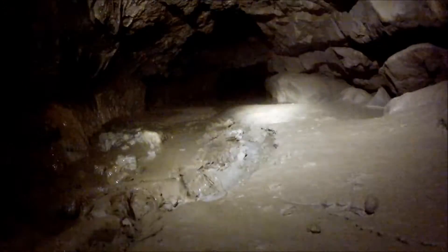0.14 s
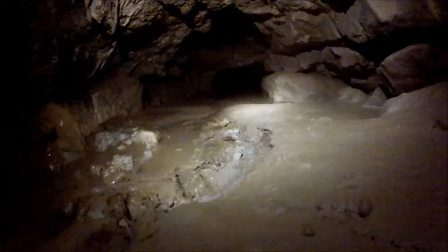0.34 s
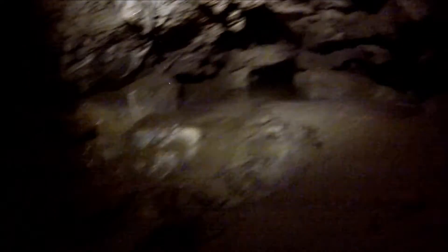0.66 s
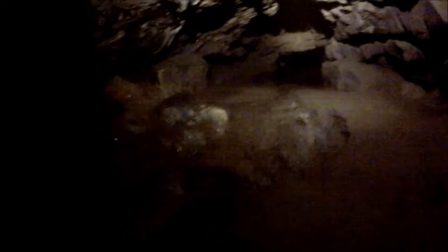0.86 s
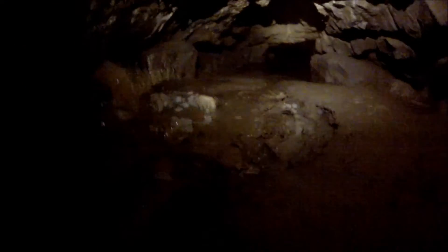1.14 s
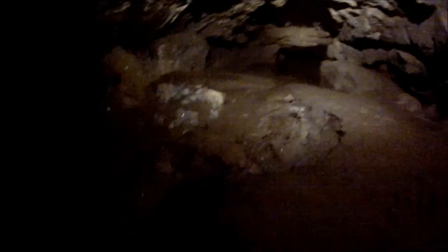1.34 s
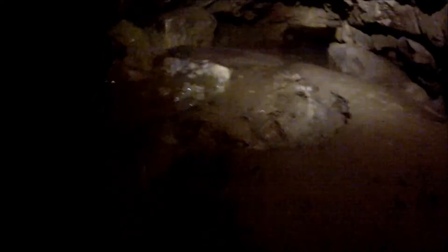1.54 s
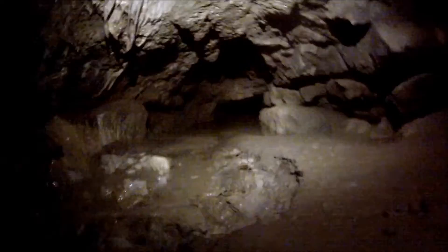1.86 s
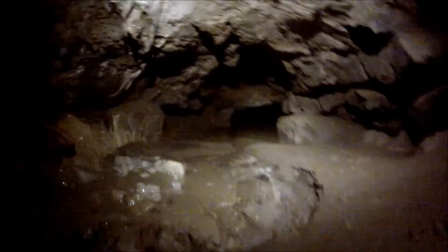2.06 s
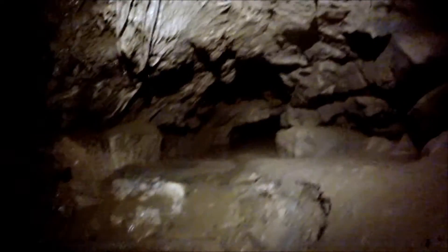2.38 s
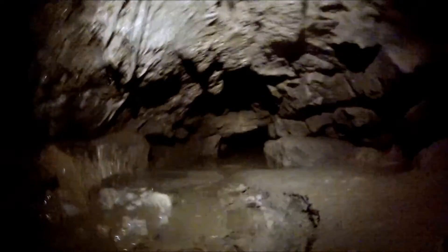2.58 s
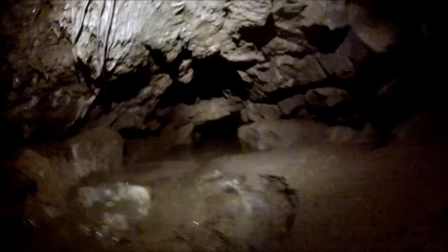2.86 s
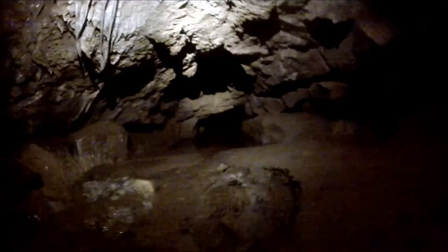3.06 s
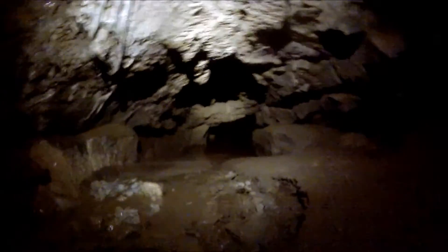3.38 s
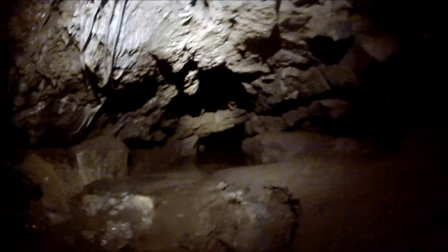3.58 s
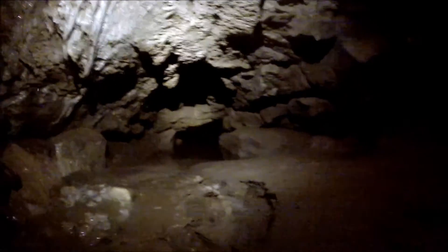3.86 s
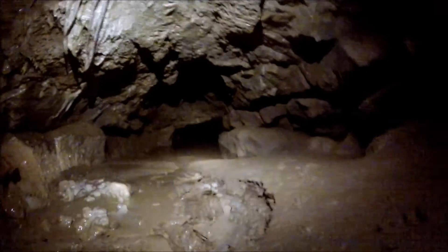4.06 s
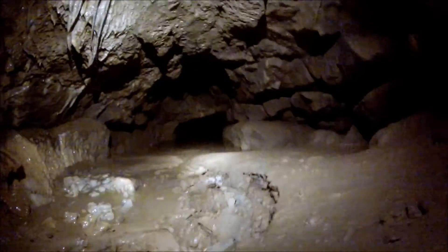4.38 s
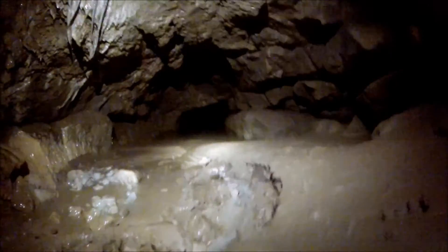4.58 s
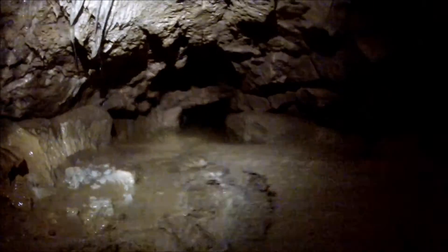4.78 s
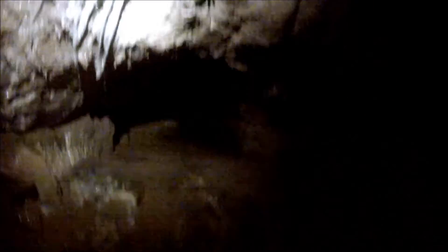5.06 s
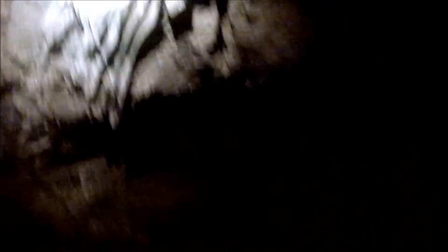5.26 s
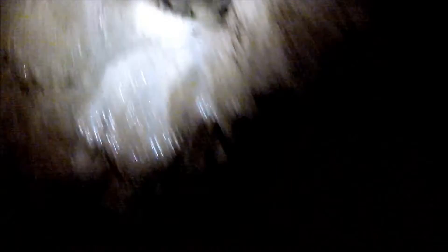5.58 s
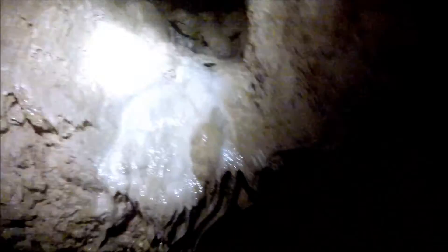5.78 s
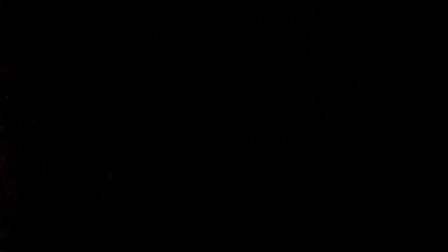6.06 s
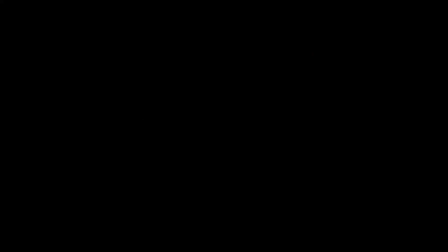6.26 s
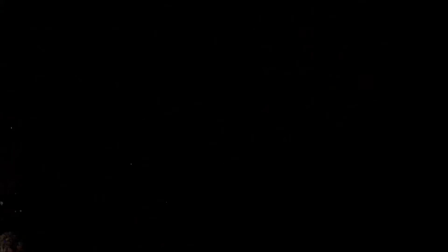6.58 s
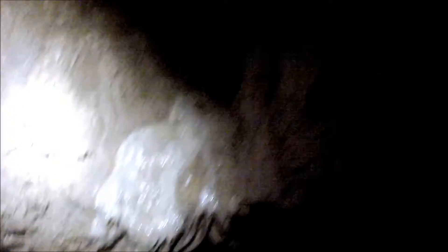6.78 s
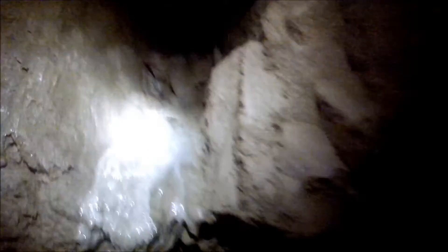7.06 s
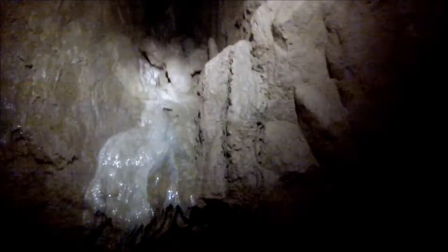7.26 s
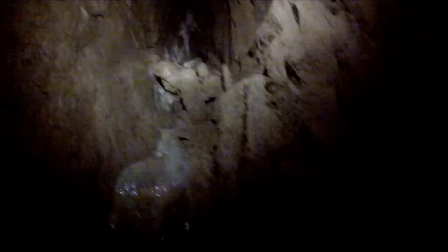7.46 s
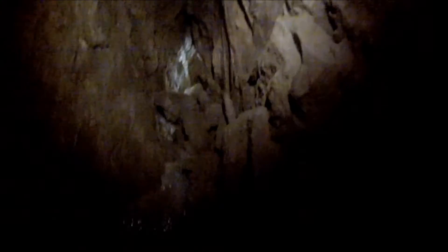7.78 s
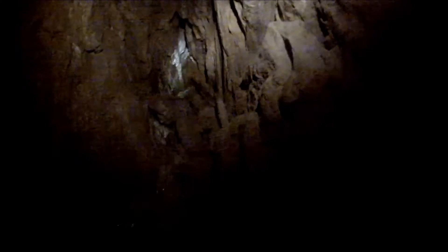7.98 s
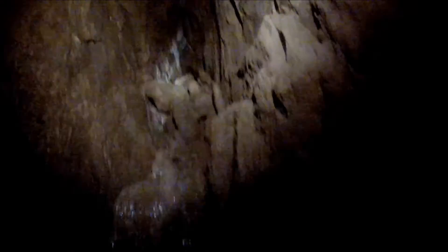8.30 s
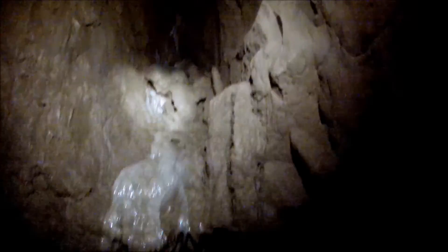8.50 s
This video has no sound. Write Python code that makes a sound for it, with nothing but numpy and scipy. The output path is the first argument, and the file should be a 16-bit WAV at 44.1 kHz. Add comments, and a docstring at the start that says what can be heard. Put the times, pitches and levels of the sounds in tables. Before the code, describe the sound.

In a small rocky cave, wet muddy gear drags, swipes and knocks against the camera case, very close and nearly dry. Sharp clacks, dull thumps and small squelches come thickest in the first three seconds, then thin out. After about four and a half seconds the handling stops, and a thin stream of water remains, with gurgles, drips and a short cave echo over faint low rumble.

```python
"""A small cave: water trickles while someone shifts about in the mud with a camera.
Wet gear drags, swipes and knocks against the camera's case: stick-slip jolts and blows through its
resonances, plus low flexing, bumps and squelches. Then the movement stops, leaving the running water
(filtered noise, bubbles), gurgles and a few drips (damped sines, spatter), over a deep rumble."""
import sys
import numpy as np
from scipy import signal
from scipy.fft import rfft, irfft, next_fast_len
from scipy.io import wavfile
from scipy.ndimage import uniform_filter1d, map_coordinates

SR = 44100
rng = np.random.default_rng(int(sys.argv[2]) if len(sys.argv) > 2 else 0)


def to_wav(s):
    """Save 16-bit WAV."""
    ch = np.atleast_2d(s).T  # columns
    pcm = np.round(np.clip(ch, -1, 1) * 32767)  # PCM
    wavfile.write(sys.argv[1], SR, pcm.astype(np.int16))


N = 380577
T = np.arange(N) / SR


def amp(db):
    """Decibels to gain."""
    return 10 ** (np.asarray(db) / 20)


def unit(x):
    """Scale to rms 1."""
    return x / np.sqrt(np.mean(x ** 2) + 1e-20)


def along(points, hz):
    """Interpolate (frequency [Hz], value) points on a log frequency axis."""
    f, v = np.transpose(points)
    return np.interp(np.log(hz + 1), np.log(f + 1), v)


def humps(rows, hz):
    """Sum of bell-shaped lifts and dips [dB]."""
    return sum(db * np.exp(-((hz - centre) / width) ** 2) for centre, width, db in rows)


def level_curve(rows):
    """Interpolate (time [s], level [dB]) rows to one value per sample."""
    s, db = np.transpose(rows)
    return np.interp(T, s, db)


def wobble(rate_hz):
    """Smooth random curve, rate_hz knots per second."""
    return map_coordinates(rng.standard_normal(int(N * rate_hz / SR) + 4), [T * rate_hz])


def coloured(x, db_of):
    """Causal minimum-phase filter with gain db_of(Hz), built from its folded cepstrum."""
    m = 2 * next_fast_len(N // 2 + 8192)
    gain = amp(db_of(np.fft.rfftfreq(m, 1 / SR)))
    cepstrum = irfft(np.log(gain + 1e-6), m)
    cepstrum[1:m // 2] *= 2
    cepstrum[m // 2 + 1:] = 0
    return irfft(rfft(x, m) * np.exp(rfft(cepstrum)), m)[:N]


def coloured_noise(points):
    """White noise shaped by (frequency [Hz], gain [dB]) points, rms 1."""
    return unit(coloured(rng.standard_normal(N), lambda hz: along(points, hz)))


def patchy(x, depth_db, size):
    """Shifting colour: smooth random gain over time and frequency, within +-2 depth_db."""
    z = signal.stft(x, nperseg=512)[2]
    field = rng.standard_normal(z.shape)
    for _ in range(2):
        field = uniform_filter1d(uniform_filter1d(field, size, 0), size + 1, 1)
    gain_db = depth_db * 2 * np.tanh(unit(field) / 2)
    return signal.istft(z * amp(gain_db), nperseg=512)[1][:N]


def add(track, s, sound):
    """Mix a sound in at time s [s]."""
    part = track[max(round(s * SR), 0):][:len(sound)]
    part += sound[:len(part)]


def bubbles(count, centre_hz, cycles, spread_db):
    """Small bubbles: damped sines, phase advancing faster over their first three decay times."""
    t = np.arange(SR // 40) / SR
    start = rng.integers(0, N, (count, 1))
    hz = np.clip(centre_hz * np.exp(0.36 * rng.standard_normal((count, 1))), 1100, SR / 4)
    size = amp(spread_db * np.minimum(rng.exponential(size=(count, 1)), 3))
    age = t * hz / cycles  # in decay times
    envelope = size * np.exp(-age) * (1 - np.exp(-8 * age))
    rings = envelope * np.sin(2 * np.pi * hz * t * (1 + 0.028 * np.minimum(age, 3)))
    when = start + np.arange(len(t))
    return unit(np.bincount(when.ravel(), rings.ravel())[:N])


# running water, before STREAM_DB: (time [s], level [dB])
FLOW_LEVEL = [(4.62, -63.5), (4.72, -58.5), (5.1, -64), (6.8, -63.5), (8.63, -65)]
# wash spectrum, relative: (frequency [Hz], density [dB per Hz])
WASH_SPECTRUM = [(60, -30.5), (200, -6.5), (330, -5), (550, -6.5), (800, -6.5), (1200, -6.5), (1850, -4.5),
                 (2900, -6.5), (3600, -7), (4500, -10.5), (7000, -13), (10000, -16), (15500, -19.5)]
STREAM_DB, FIZZ_DB = 0.78, -10.0  # FIZZ_DB relative to the wash


def stream():
    """Thin running water: a noise wash of shifting colour with fine bubbles."""
    wash = patchy(rng.standard_normal(N), depth_db=2.6, size=6)
    wash = unit(coloured(wash, lambda hz: along(WASH_SPECTRUM, hz) + 0.4 * humps(CASE_MODES, hz)))
    fizz = bubbles(count=2500, centre_hz=2240, cycles=10.8, spread_db=5.0)
    level_db = level_curve(FLOW_LEVEL) + STREAM_DB + 0.98 * wobble(7.7)
    return amp(level_db) * (wash + amp(FIZZ_DB) * fizz)


# deep murmur, before RUMBLE_DB: (time [s], level [dB])
MURMUR_LEVEL = [(0, -53), (2.7, -52), (3.3, -63), (7.4, -63.5), (8.63, -70.5)]
# deep murmur spectrum, relative: (frequency [Hz], density [dB per Hz])
HOLLOW_SPECTRUM = [(10, -13.5), (20, 2), (50, -2.5), (80, -12.5), (130, -20), (300, -56.5)]
# far water spectrum, relative: (frequency [Hz], density [dB per Hz])
DISTANT_SPECTRUM = [(40, -22.5), (100, -1.5), (160, -1), (260, -2), (400, -7), (600, -13.5), (1000, -36)]
RUMBLE_DB, DISTANT_DB = 4, -65.5


def rumble():
    """Deep murmur of the passage and dull water farther along it: two low noise bands."""
    murmur_db = level_curve(MURMUR_LEVEL) + RUMBLE_DB + 0.79 * wobble(4.0)
    deep = amp(murmur_db) * coloured_noise(HOLLOW_SPECTRUM)
    return deep + amp(DISTANT_DB) * coloured_noise(DISTANT_SPECTRUM)


def jerks(rate_hz, spread_db):
    """Single jolts at random moments, mostly small, rms 1."""
    fires = rng.random(N) < rate_hz / SR
    size = amp(spread_db * np.minimum(rng.exponential(size=N), 3))
    return unit(fires * rng.choice([-1, 1], N) * size)


def slips(rate_hz, spread_db, smooth):
    """Stick-slip: clumped jerks over fibre hiss, colour moving with the contact; grit snaps on top."""
    clump_db = 5 * np.tanh((2.3 * wobble(140) + 0.9 * wobble(35)) / 5)
    fibres = smooth * rng.standard_normal(N)
    clumped = (jerks(rate_hz, spread_db) + fibres) * amp(clump_db)
    grit = jerks(rate_hz=220, spread_db=5)
    return unit(unit(patchy(clumped, depth_db=4.5, size=4)) + .5 * grit)


# slip of wet fabric: (frequency [Hz], gain [dB])
SLIP_SPECTRUM = [(40, -24), (300, -15.5), (650, -24.5), (950, -11.5), (1500, -4.5), (2000, -2.5),
                 (2900, -10.5), (4000, -16.5), (5500, -23.5), (8000, -21), (15500, -19.5)]
# case resonances: (centre [Hz], half width to 1/e of lift [Hz], lift at firmness 1 [dB])
CASE_MODES = [(1127, 103, 4.5), (2350, 290, 7), (3542, 410, 13), (4920, 340, 5.5), (7100, 320, 3),
              (8444, 343, 13), (9680, 660, 8), (14150, 420, 4.5)]


def on_case(x, firmness):
    """Slips heard through the case; firmer contact brings out its resonances."""
    return coloured(x, lambda hz: along(SLIP_SPECTRUM, hz) + firmness * humps(CASE_MODES, hz))


DRAG_SWELL_DB, DRAG_EASE_DB = 8.5, 6.5  # gain up to the hardest moment, loss after it
GRIP_S, RELEASE_S = 0.021, 0.03  # 20 dB rise / fall times outside a drag


def drag_db(hardest_s, swell_s, ease_s, db):
    """Level of one drag [dB]: grips, swells to its hardest moment, eases, lets go."""
    start, end = hardest_s - swell_s, hardest_s + ease_s
    pressing = np.interp(T, [start, hardest_s, end], [-DRAG_SWELL_DB, 0, -DRAG_EASE_DB])
    outside = np.maximum(start - T, 0) / GRIP_S + np.maximum(T - end, 0) / RELEASE_S
    return db + pressing - 20 * np.minimum(outside, 10)


# slow drags of wet gear:
# (hardest moment [s], swell [s], ease [s], body level [dB], crispness: treble over body [dB])
DRAG_EVENTS = [(.52, .17, 0.18, -55.5, 0), (.97, 0.074, 0.041, -38, -7), (1.13, 0.069, 0.057, -41, -3.5),
               (1.312, 0.074, 0.091, -44.5, -1), (1.42, 0.011, .035, -32, -4.5),
               (1.711, 0.22, 0.037, -29, 0.5), (1.84, 0.12, 0.075, -36, -3.5),
               (1.939, 0.038, 0.074, -34.5, 3.5), (2.51, 0.06, 0.052, -31, 1.5),
               (2.69, 0.087, 0.074, -28, -1.5), (2.885, 0.052, 0.041, -35, 0),
               (3.009, 0.026, 0.059, -37, -2), (3.15, 0.017, .13, -42, -6.5), (3.42, 0.069, 0.032, -46, -2),
               (3.609, 0.029, 0.17, -42, -4), (3.86, 0.094, 0.06, -38, -1.5),
               (3.98, .03, 0.094, -41.5, -5.5), (4.19, 0.057, 0.035, -42.5, -2.5),
               (4.52, .06, 0.03, -38, -1.5)]
# light contact under and between the strokes: (start [s], end [s], level [dB])
LIGHT_BRUSH = (0.0, 4.22, -62)


def drags():
    """Fabric creeps over the case: slips split at 2.8 kHz, each drag dull or crisp by treble share."""
    rub = on_case(slips(rate_hz=1300, spread_db=2.5, smooth=0.72), firmness=0.78)
    body = signal.sosfiltfilt(signal.butter(6, 2800, fs=SR, output="sos"), rub)
    body, crisp = unit(body), unit(rub - body)
    first, last, brush_db = LIGHT_BRUSH
    fade = np.clip(np.minimum(T - first, last - T) / RELEASE_S, 0, 1)
    out = amp(brush_db) * fade * unit(rub)
    for hardest_s, swell_s, ease_s, db, crisp_db in DRAG_EVENTS:
        out += amp(drag_db(hardest_s, swell_s, ease_s, db)) * (body + amp(crisp_db) * crisp)
    return out


# quick swipes: (peak time [s], level [dB], 20 dB rise [s], 20 dB fall [s], contact firmness [-])
SWIPE_EVENTS = [(0.07, -42.5, 0.088, 0.069, .5), (0.8984, -23, 0.01, 0.021, 0.6),
                (0.965, -25, 0.017, 0.028, 0.45), (1.313, -25, 0.038, 0.028, 0.64),
                (1.843, -30.5, 0.02, 0.018, 0.45), (1.957, -23.5, 0.032, 0.034, 1.1),
                (2.147, -25, 0.0025, 0.017, 0.43), (2.187, -18.5, 0.029, 0.019, 1.27),
                (2.275, -21, 0.039, 0.011, 1.4), (2.316, -17.5, 0.015, 0.015, 1.7),
                (2.41, -37, 0.047, 0.032, 0.84), (2.509, -29.5, .004, .016, .7),
                (2.823, -21, 0.0061, 0.014, 1.7), (3.473, -30, 0.033, 0.078, 1.1),
                (4.195, -37.5, 0.016, 0.01, .9), (4.405, -49.5, 0.046, 0.048, 0.67),
                (4.541, -28.5, 0.029, 0.021, 1.1)]


def swipes():
    """Fast strokes swell and break off; firmness crossfades light to firm contact."""
    source = slips(rate_hz=2500, spread_db=3.0, smooth=0.49)
    light, firm = unit(on_case(source, firmness=0.57)), unit(on_case(source, firmness=1.82))
    out = np.zeros(N)
    for s, db, rise_s, fall_s, firmness in SWIPE_EVENTS:
        away = np.where(T < s, (s - T) / rise_s, (T - s) / fall_s)
        share = np.clip(firmness - .5, 0, 1)
        stroke = unit((1 - share) * light + share * firm)
        out += amp(db - 20 * np.minimum(away, 5) ** 1.45) * stroke
    return out


# flexing case spectrum, relative: (frequency [Hz], density [dB per Hz])
FLEX_SPECTRUM = [(20, -15), (60, 1), (115, -4), (200, -6), (350, -14.5), (600, -26), (1500, -54)]
FLEX_DB, FLEX_GROWTH = -56, 0.54  # level under a -40 dB rub; dB per dB of rub
SHUDDER_DB, SHUDDER_RISE_S, SHUDDER_FALL_S = -12, 0.021, 0.027  # relative to BUMP_EVENTS level; 20 dB times


def flexing(rubbing):
    """The case flexes with a low rustle: noise that follows rubbing power and surges around bumps."""
    power = np.abs(uniform_filter1d(rubbing ** 2, size=SR // 40))
    over_db = 10 * np.log10(power + 1e-12) + 40
    strain = amp(FLEX_DB + FLEX_GROWTH * over_db)
    for s, db, _ in BUMP_EVENTS:
        away = np.where(T < s, (s - T) / SHUDDER_RISE_S, (T - s) / SHUDDER_FALL_S)
        strain += amp(db + SHUDDER_DB - 20 * np.minimum(away, 10))
    return strain * coloured_noise(FLEX_SPECTRUM)


# sharp knocks, before KNOCK_DB: (time [s], level [dB])
KNOCK_EVENTS = [(0.0194, -25), (0.733, -28.5), (0.762, -30), (0.8963, -10.5), (0.96, -16), (1.2556, -25.5),
                (1.2806, -18), (1.3137, -9.5), (1.41, -10.5), (1.4749, -15), (1.529, -17), (1.712, -9),
                (1.8404, -9.5), (1.933, -10.5), (1.949, -5), (2.1055, -28), (2.144, -17), (2.407, -20),
                (2.459, -12.5), (2.4823, -14), (2.65, -15), (2.659, -11.5), (2.7445, -20), (3.469, -14),
                (3.642, -27.5), (3.9484, -22), (4.075, -28.5), (4.315, -38.5), (4.4085, -20)]
# knocks that bounce, before KNOCK_DB: (first contact [s], level [dB])
RATTLE_EVENTS = [(0.0579, -9), (2.8204, -13)]
KNOCK_DB, BOUNCE_S, BOUNCE_LOSS_DB = 16.5, .0071, 7  # interval and loss per bounce


def knocks():
    """Hard gear strikes the case: impulse and short chatter through its modes; loose bits bounce."""
    blows, t = np.zeros(N), np.arange(SR // 40) / SR
    bounces = [(s + k * BOUNCE_S, db - k * BOUNCE_LOSS_DB) for s, db in RATTLE_EVENTS for k in range(4)]
    for s, db in bounces + KNOCK_EVENTS:
        chatter = 0.11 * rng.standard_normal(len(t)) * amp(-60 * t / 0.016)
        chatter[0] += 1
        add(blows, s, amp(db + KNOCK_DB) * chatter)
    tilt = [(200, -0.5), (2000, 1.0), (6000, 2.0), (15000, 0)]  # (frequency [Hz], gain [dB])
    return on_case(coloured(blows, lambda hz: along(tilt, hz)), firmness=1.115)


# dull bumps, before gain and glide: (time [s], level [dB], nominal pitch [Hz])
BUMP_EVENTS = [(0.893, -22.5, 105), (0.957, -13.5, 107), (1.304, -25.5, 132), (1.655, -18, 104),
               (1.702, -18.5, 170), (1.8395, -8, 90), (2.179, -35, 129.5), (2.25, -34.5, 109),
               (2.317, -41, 106), (2.588, -22, 89), (2.712, -21.5, 109), (3.122, -28.5, 115),
               (4.525, -38.5, 100)]


def bumps():
    """Soft blows push the case: a short sine gliding down from first contact, with a noise puff."""
    out, puffs, t = np.zeros(N), np.zeros(N), np.arange(SR // 6) / SR
    for s, db, hz in BUMP_EVENTS:
        cycles = hz * (0.843 * t + 0.0036 * (1 - np.exp(-t / 0.0034)))  # stiffest at first contact
        push = amp(db + 3 - 60 * t / 0.052) * (1 - np.exp(-t / 0.0032))
        add(out, s, push * np.sin(2 * np.pi * cycles))
        add(puffs, s, amp(db - 9 - 60 * t / 0.055) * rng.standard_normal(len(t)))
    # (frequency [Hz], gain [dB])
    dull = [(60, -17.5), (240, 1), (450, -6.5), (750, -2.5), (1500, -18.5), (5000, -70.5)]
    return out + coloured(puffs, lambda hz: along(dull, hz))


# wet fold resonates: (centre time [s], level [dB], pitch [Hz], half length to 1/e [s])
SQUELCH_EVENTS = [(0.9, -22, 2150, .006), (2.446, -35, 1464, 0.016), (2.451, -32.5, 2650, 0.013),
                  (2.51, -24, 1573, 0.012), (2.602, -28.5, 1787, 0.023), (2.702, -23.5, 2160, .018),
                  (3.162, -42.5, 1800, 0.028)]


def squelches():
    """Slips ring in a small pocket of wet fabric: two resonators in series, gated by a bell."""
    source, out = slips(rate_hz=900, spread_db=3.5, smooth=1.0), np.zeros(N)
    for s, db, hz, length_s in SQUELCH_EVENTS:
        b, a = signal.iirpeak(hz, 7, fs=SR)
        pocket = unit(signal.lfilter(b, a, signal.lfilter(b, a, source)))
        bell = np.exp(-np.minimum(((T - s) / length_s) ** 2, 20))
        out += amp(db) * bell * pocket
    return out


# gurgles in the stream: (centre time [s], level per bubble [dB], centre pitch [Hz], onset span [s])
GURGLE_EVENTS = [(4.60, -55, 1890, 0.027), (5.29, -61, 1200, 0.027), (5.883, -59, 1150, 0.07),
                 (6.086, -52, 1770, 0.077), (6.28, -53, 1990, 0.047), (6.58, -55, 1270, .05),
                 (6.666, -57, 1400, .07), (6.74, -51.5, 1950, .05), (6.837, -51.5, 1890, .09),
                 (7.52, -55.5, 3400, 0.077), (8.352, -53.5, 1610, 0.076)]


def gurgles():
    """Each gurgle is seven bubbles of nearly one size: damped sines of rising pitch."""
    out, t = np.zeros(N), np.arange(SR // 20) / SR
    for s, db, hz, span_s in GURGLE_EVENTS:
        for when, detune in rng.uniform(-1, 1, size=(7, 2)):
            chirp = np.sin(2 * np.pi * hz * (1 + .11 * detune) * t * (1 + 1.6 * t))
            envelope = amp(db - 60 * t / 0.027) * (1 - np.exp(-t / 0.0011))
            add(out, s + when * span_s / 2, envelope * chirp)
    return out


# drips nearby, before gain: (time [s], level [dB], main pitch [Hz], ringing share [0-1])
DRIP_EVENTS = [(4.8042, -28.5, 4170, 0.74), (4.9137, -35.5, 4130, 0.48), (4.924, -41, 2650, 0.1),
               (5.3089, -42.5, 1460, 0.42), (5.3756, -36.5, 2550, 0.25), (5.391, -37, 2470, 0.13),
               (5.6353, -29.5, 2440, 0.17), (5.97, -45.5, 3500, 0.15), (6.12, -40, 2230, 0.25),
               (6.5576, -46.5, 2250, 0.34), (6.7681, -44, 2400, 0.3), (7.2535, -36.5, 1570, 0.2),
               (7.4244, -41, 3600, 0.1), (7.713, -41, 3730, 0.16)]


def drips():
    """Drops smack on wet rock (impulse, spatter); those that hit a puddle ring at several pitches."""
    smacks, rings, t = np.zeros(N), np.zeros(N), np.arange(SR // 5) / SR
    # (pitch ratio [-], level [dB], t60 [s])
    partials = [(1, 0, .035), (1.01, -22, .25), (.838, 0, .04),
                (.77, -1, .025), (1.28, -13, .03), (1.86, -14, .05)]
    for s, db, hz, share in DRIP_EVENTS:
        ring = sum(amp(level - 60 * t / t60) * np.sin(2 * np.pi * hz * ratio * t)
                   for ratio, level, t60 in partials)
        add(rings, s, amp(db - 1.0) * share * (1 - np.exp(-t / 0.00076)) * ring)
        spatter = 0.3 * rng.standard_normal(len(t)) * amp(-60 * t / 0.0069)
        spatter[0] += 1
        add(smacks, s, amp(db + 17.5) * (1 - share) * spatter)
    bright = [(1000, -10), (2300, 3.5), (12000, 5.5)]  # (frequency [Hz], gain [dB])
    return rings + on_case(coloured(smacks, lambda hz: along(bright, hz)), firmness=1)


# reverberation: (frequency [Hz], t60 [s])
CAVE_T60 = [(100, 0.64), (1000, 0.39), (4000, 0.21), (14000, 0.26)]


def cave(x):
    """The rock walls answer: convolution with noise decaying at a rate set per frequency."""
    hz, t, z = signal.stft(rng.standard_normal(SR // 2), SR, nperseg=256)
    decay = amp(-60 * t / along(CAVE_T60, hz)[:, None])
    tail = signal.istft(z * decay, SR, nperseg=256)[1]
    return signal.fftconvolve(x, tail / np.linalg.norm(tail))[:N]


def scene():
    """Contact sounds are nearly dry; the water sits in the cave's echo."""
    rubbing = drags() + swipes()
    contact = rubbing + squelches() + knocks()
    water = stream() + gurgles() + drips()
    echo = cave(amp(-21) * contact + amp(-12.0) * water)
    return (contact + flexing(rubbing) + bumps() + water + rumble() + echo)[None]


# two bands left weak in the sound, a dip near 6 kHz and a wide gap near 12 kHz:
# (centre [Hz], half width to 1/e of dip [Hz], gain [dB])
BAND_DIPS = [(6030, 172, -11), (11994, 820, -44.5)]
TOP_HZ = 15600


def record(dry):
    """Tone of the whole scene: a narrow dip near 6 kHz, a broad gap near 12 kHz, nothing from TOP_HZ up."""
    m = next_fast_len(N + SR // 2)
    hz = np.fft.rfftfreq(m, 1 / SR)
    dipped = coloured(dry[0], lambda f: humps(BAND_DIPS, f))
    return irfft(rfft(dipped, m) * (hz < TOP_HZ), m)[None, :N]


dry = scene()
out = record(dry)
to_wav(out)
```